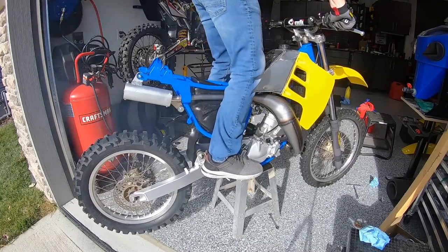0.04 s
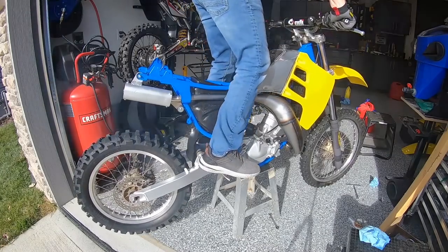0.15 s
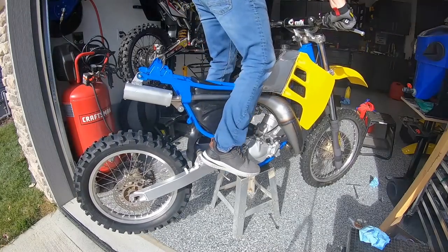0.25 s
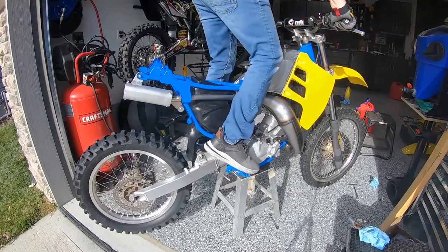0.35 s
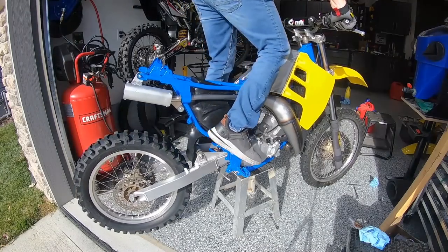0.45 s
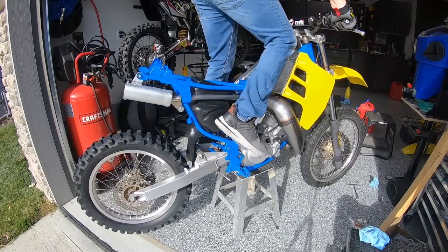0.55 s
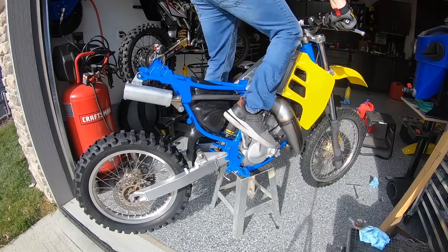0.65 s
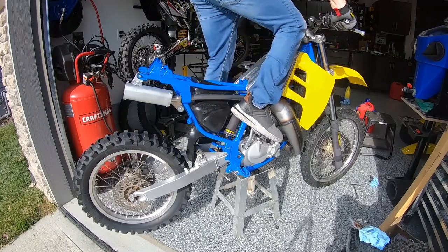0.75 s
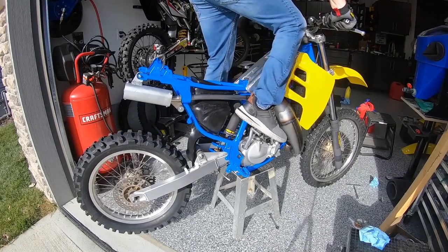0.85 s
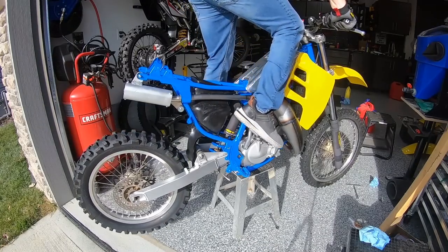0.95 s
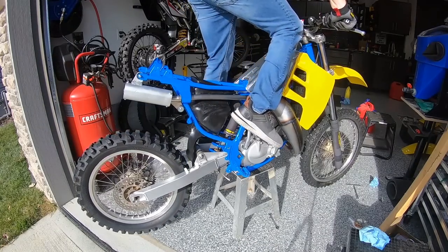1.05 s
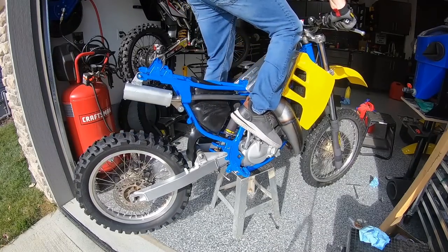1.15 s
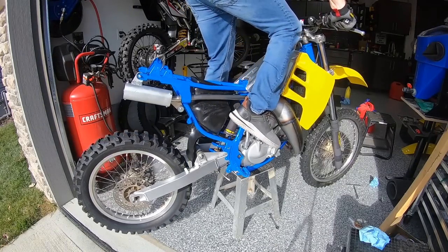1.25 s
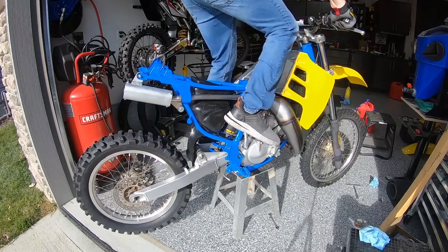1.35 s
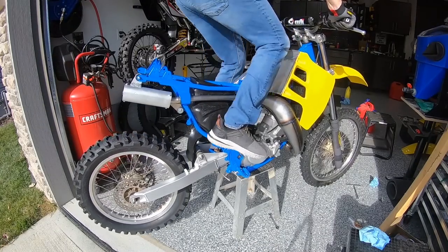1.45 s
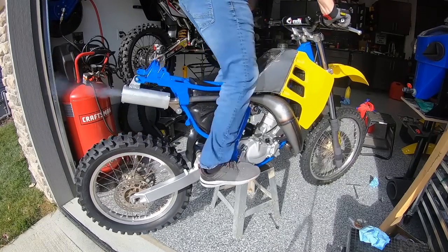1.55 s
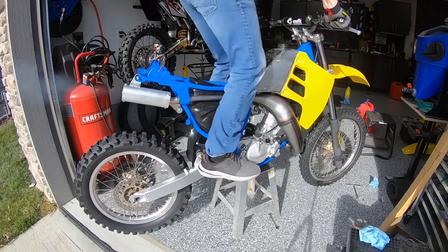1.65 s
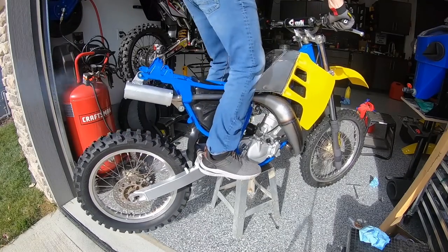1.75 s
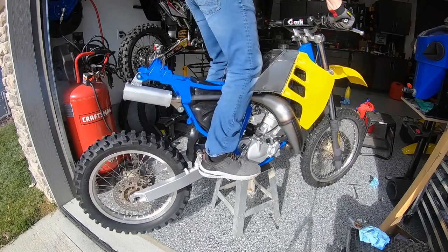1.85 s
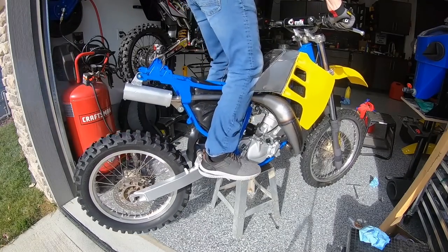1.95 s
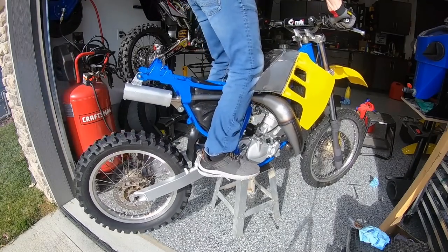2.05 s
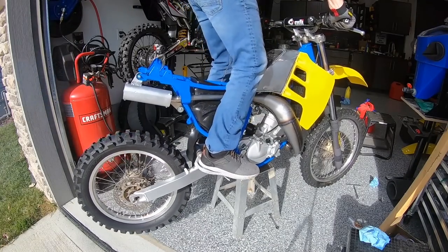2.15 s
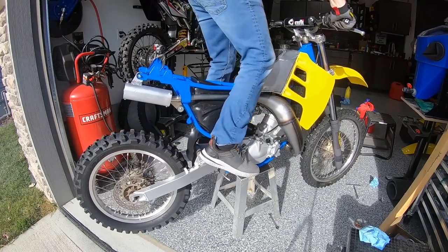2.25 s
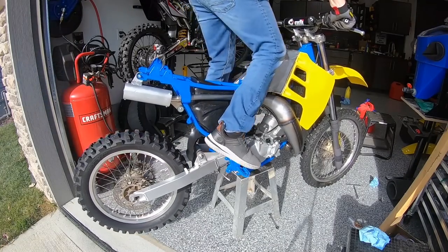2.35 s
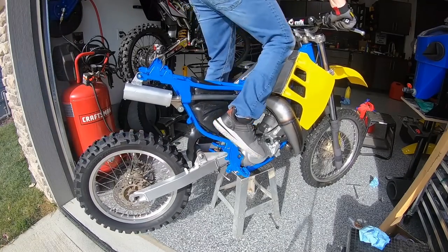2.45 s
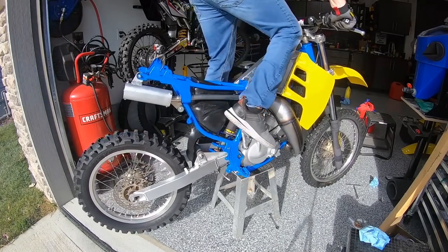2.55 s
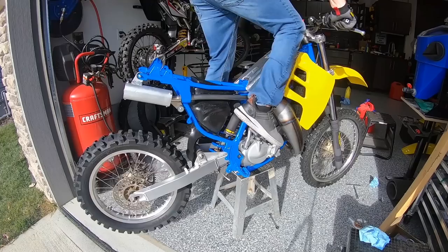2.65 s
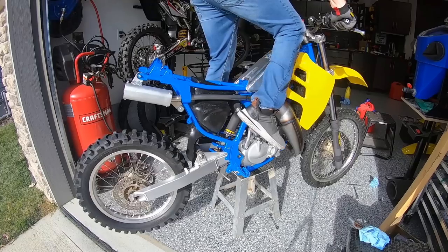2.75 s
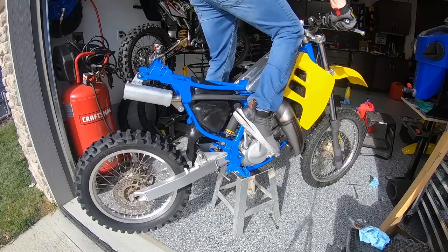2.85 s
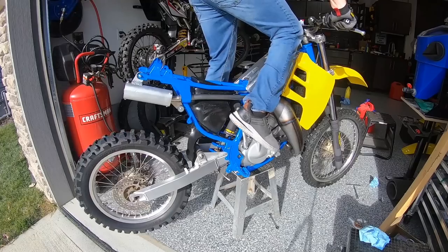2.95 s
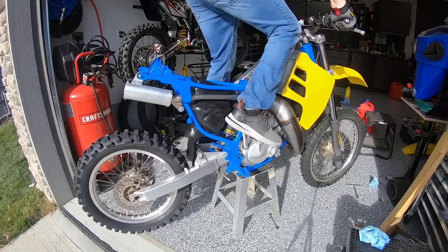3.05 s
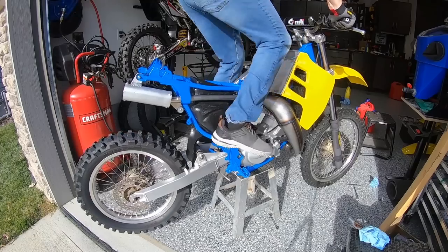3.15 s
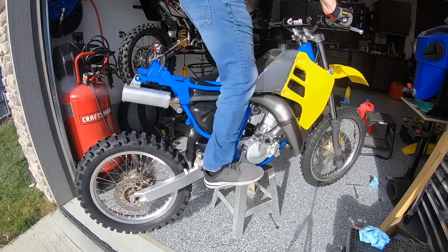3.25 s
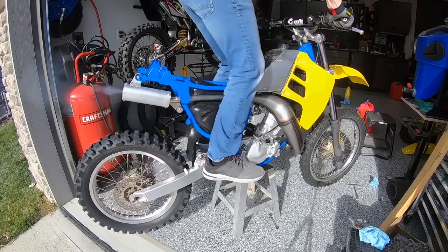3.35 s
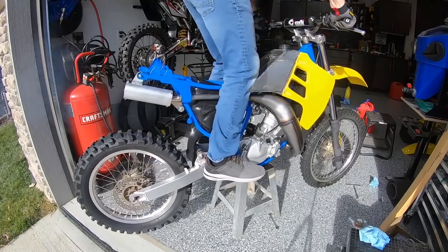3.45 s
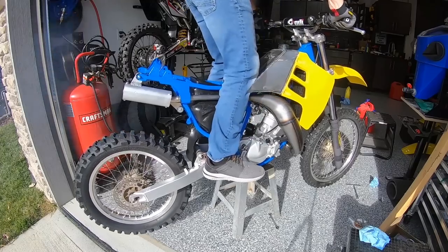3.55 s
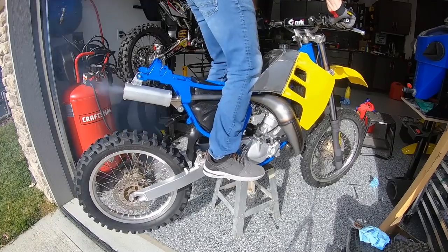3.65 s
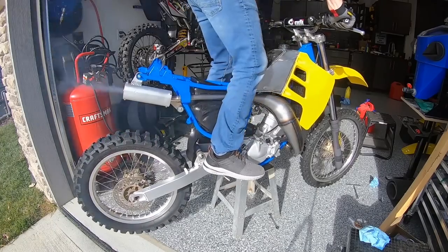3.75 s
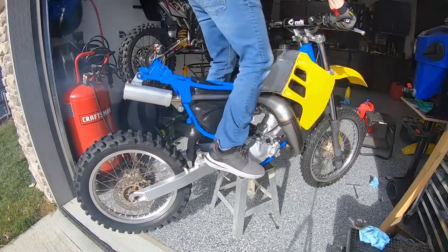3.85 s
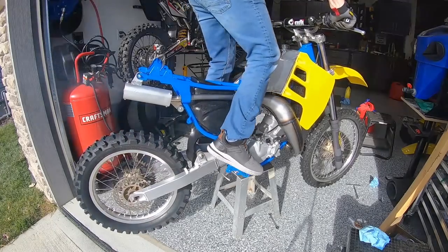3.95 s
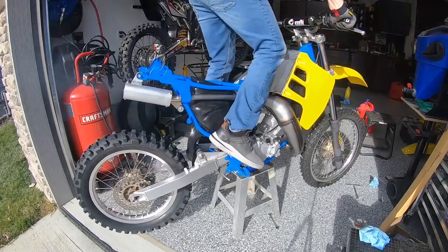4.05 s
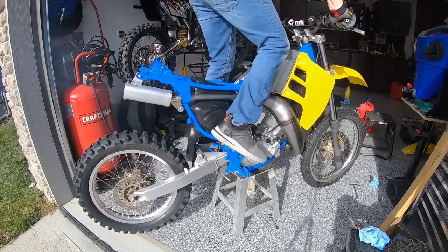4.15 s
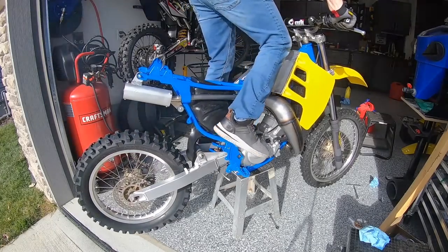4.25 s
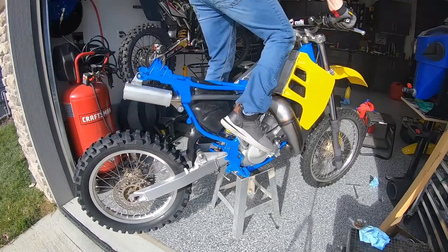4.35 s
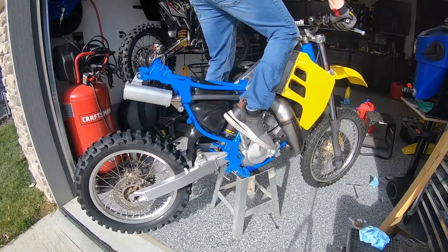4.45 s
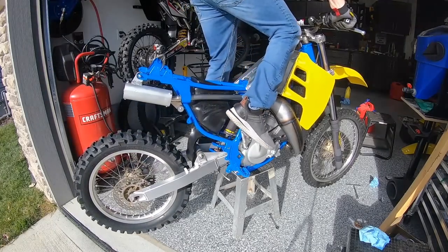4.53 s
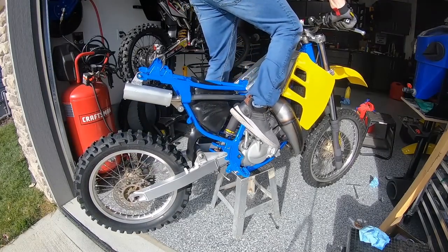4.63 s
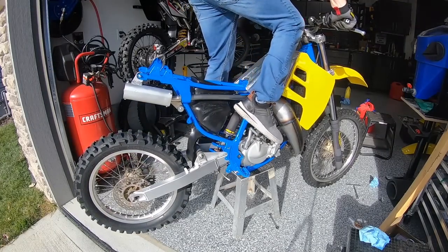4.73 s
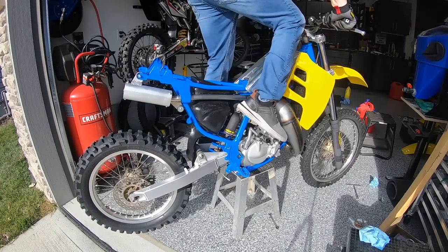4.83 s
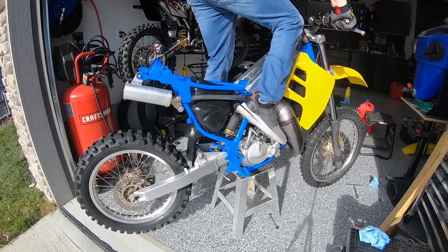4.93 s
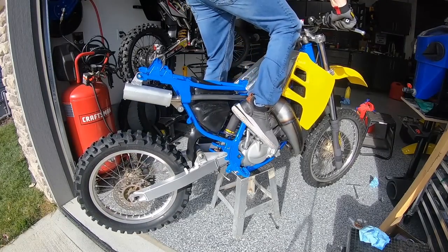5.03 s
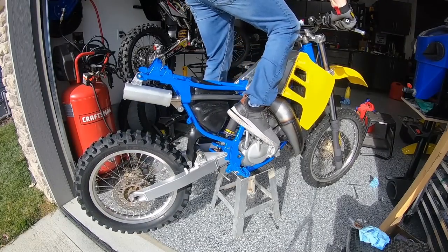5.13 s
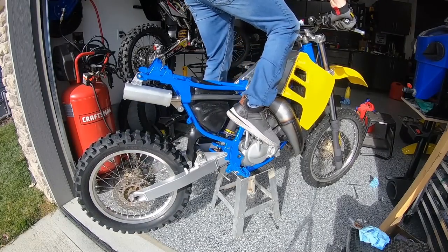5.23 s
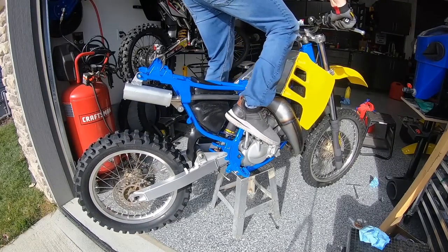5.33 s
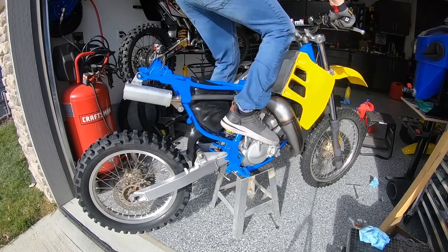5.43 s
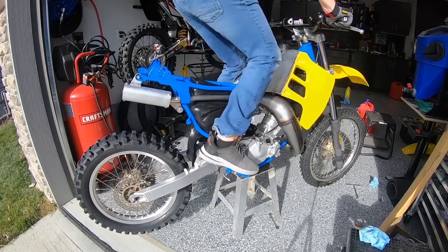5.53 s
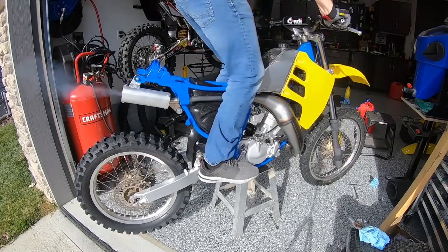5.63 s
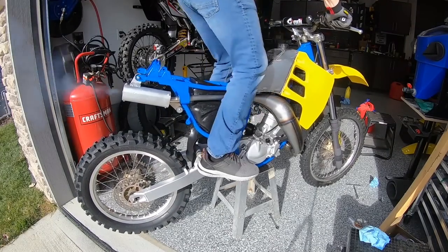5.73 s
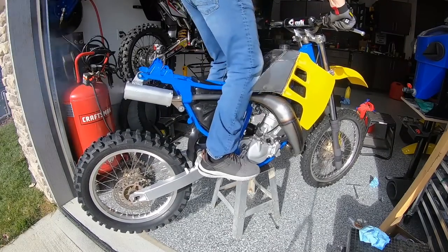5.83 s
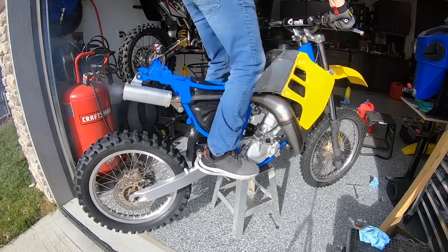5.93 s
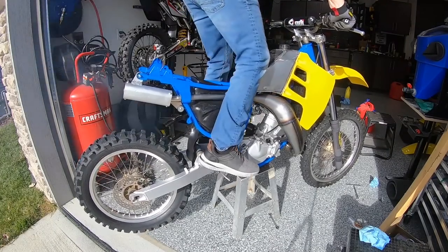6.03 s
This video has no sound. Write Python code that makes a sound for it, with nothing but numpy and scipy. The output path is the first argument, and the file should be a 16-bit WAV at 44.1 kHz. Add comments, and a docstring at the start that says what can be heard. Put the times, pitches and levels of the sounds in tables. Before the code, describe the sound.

Kick lever ratchets and clinks, then repeated kicks make a two-stroke engine bark, chuff and whirr briefly without catching, with wind buffeting the microphone.

```python
"""A two-stroke dirt bike on a stand in an open garage, in stereo, with light wind rumbling on the microphone.
First an attempt dies away: the kick lever's pawl ratchets, air whistles from the cylinder, the lever clinks.
The foot eases the piston to compression and kicks; chuffs boom in the pipe, charges bark, gears whirr and slow.
More ratcheting and whistles lead to a second kick, which nearly catches, then rattles down.
After gusts comes a third kick, its gears still whirring at the end. Noise, sines and resonances make it all."""
import sys
import numpy as np
from scipy import signal
from scipy.fft import rfft, irfft, next_fast_len
from scipy.io import wavfile
from scipy.ndimage import uniform_filter1d, map_coordinates

SR = 44100
rng = np.random.default_rng(int(sys.argv[2]) if len(sys.argv) > 2 else 0)


def wav_record(signal):
    """Record a signal, one row per channel, as 16-bit PCM in the file named by sys.argv[1]."""
    frames = np.transpose(np.atleast_2d(signal))
    bounded = np.clip(frames, -1, 1)
    # unit amplitude maps onto the largest positive 16-bit level
    quanta = np.round(bounded * 32767).astype(np.int16)
    wavfile.write(sys.argv[1], SR, quanta)


N = 268480
TIME = np.arange(N) / SR

# Levels in the tables are relative: the functions trim them. Spectra give level_db per Hz.
# wind rumble on the microphone: start_s, level_db
WIND_LEVEL = [(0, -31.5), (0.7, -36.5), (1.2, -34.5), (1.8, -37), (2.5, -39.5), (3.2, -35), (4.5, -36),
              (5, -37.5), (5.25, -29.5), (6.09, -34)]
# swells of low noise: gusts on the microphone, and at 3.65 s a low rumble under the second kick's run:
# start_s, length_s, level_db
LOW_SWELLS = [(3.08, 0.25, -39), (3.65, 0.78, -38), (4.38, 0.063, -33), (4.65, 0.28, -30),
              (5.09, 0.2, -24.5), (5.34, 0.32, -30.5)]
# spectrum of the wind rumble: pitch_hz, level_db
RUMBLE_SPECTRUM = [(8, 6.5), (20, -3.5), (36, -6.5), (56, -9), (85, -15.5), (150, -31), (300, -47),
                   (800, -93)]
# spectrum of the low swells: pitch_hz, level_db
SWELL_SPECTRUM = [(25, -23), (60, 3), (150, -3), (240, -15.5), (400, -31), (1000, -49), (3000, -87.5)]
# spectrum of the yard's hiss: pitch_hz, level_db
AIR_SPECTRUM = [(90, 4), (150, 1), (290, 3.5), (420, -8.5), (800, -12.5), (1300, -16.5), (2000, -19),
                (4500, -31.5), (6500, -27.5), (15500, -45.5)]
# decay of the garage's tail: pitch_hz, t60_s
GARAGE_DECAY = [(200, 0.66), (1000, 0.64), (4000, 0.45), (8000, 0.27), (14000, 0.49)]
# likeness of left and right in the direct sound: pitch_hz, correlation (1 = the same)
STEREO_LIKENESS = [(250, 1), (500, 0.91), (1000, 0.62), (2000, 0.67), (4000, 0.87), (8000, 0.026),
                   (13000, 0.086)]

# air leaking past the piston: start_s, length_s, level_db, pitch_hz
WHISTLES = [(0.248, 0.42, -64, 1242), (0.622, 0.58, -62.5, 1304), (2.617, 0.17, -59, 1305),
            (2.85, 0.2, -56.5, 1305), (4.695, 0.27, -67, 1283)]
# the lever clinking against its stop: start_s, level_db, pitch_hz (centre of the ring)
CLINKS = [(0.815, -18, 5700), (2.805, -30, 6300), (4.7853, -21.5, 6000), (5.145, -27.5, 7360)]
# sharp metal snaps: the kick lever's pawl dropping over its teeth, and at 3.326 s
# a metallic crack during the second kick: start_s, level_db
METAL_SNAPS = [(0.033, -14.5), (0.065, -15.5), (0.1, -16.5), (0.429, -28.5), (0.474, -20), (0.516, -28),
               (0.587, -18.5), (0.701, -16), (2.045, -13.5), (2.408, -19.5), (2.496, -19), (2.581, -18),
               (2.678, -19), (3.073, -38), (3.326, -8), (4.731, -31), (5.026, -32.5), (5.501, -33.5)]
# dull taps as the lever takes up its slack: start_s, level_db
LEVER_TAPS = [(0.005, -16.5), (1.025, -32), (2.922, -34), (2.948, -36), (3.144, -36), (3.187, -36),
              (3.225, -25), (5.116, -36.5), (5.457, -39), (5.523, -34)]
# ringing of the lever: pitch_hz, level_db, t60_s
LEVER_MODES = [(1994, -5.5, 0.3), (3160, -14, 0.27), (4100, -5, 0.17), (6200, -17, 0.42)]
# ringing of the crankcase after a blow: pitch_hz, level_db, t60_s
CASE_MODES = [(1985, -17, 0.43), (2600, -42, .09), (3772, -0.5, 0.1), (4270, -11.5, 0.13),
              (4880, -5.5, 0.097), (7900, -3, .06)]
# spectrum of a sharp metal snap or firing crack: pitch_hz, level_db
CLICK_SPECTRUM = [(900, -5), (2000, 4.5), (3500, 5), (5200, -2.5), (7000, 3), (9500, -4), (11300, -24),
                  (15000, -34)]
# spectrum of a thud in the frame: pitch_hz, level_db
BODY_SPECTRUM = [(250, -3), (750, 5), (1300, 3.5), (1900, 0.5), (3000, -5), (7000, -31)]

# the foot easing the piston up to compression: start_s, length_s, level_db
PUSHES = [(1.23, 0.28, -43)]
# spectrum of the starter gear's slow scrape: pitch_hz, level_db
SCRAPE_SPECTRUM = [(280, -3), (380, -5), (560, 4), (800, -7), (1500, -14), (2300, 1.5), (3000, 2),
                   (4200, -14), (7300, -3.5), (9500, -15), (12000, -38)]
# single gear knocks while the crank turns slowly: start_s, level_db
GEAR_KNOCKS = [(1.346, -17.5), (1.3992, -24), (1.4707, -23.5), (2.2091, -24), (2.237, -23.5), (2.2728, -23),
               (2.3092, -23.5), (4.253, -15.5), (4.2895, -14), (4.433, -26), (4.4783, -28), (4.508, -25),
               (4.537, -26.5), (4.58, -25.5), (4.624, -26)]
# spectrum of the gears' rattle: pitch_hz, level_db
RATTLE_SPECTRUM = [(2000, -23), (3800, -30), (5000, 2.5), (6000, 1.5), (7200, 4.5), (9500, -1),
                   (11300, -17.5), (14500, -23.5), (16000, -42)]
# spectrum of the gears' whirr: pitch_hz, level_db
WHIRR_SPECTRUM = [(1200, -33), (2100, 0), (2700, 0), (3900, -2.5), (4700, -4.5), (7000, -53)]
# resonances of the crankcase and its covers: pitch_hz, width_hz, level_db
COVER_RESONANCES = [(1946, 42, 6.5), (2580, 23, 4), (2990, 240, -5), (3780, 66, 6), (4090, 53, -9),
                    (5040, 120, -21)]

# crank speed, one curve for each run, the first already dying: start_s, speed_turns_per_s
SPEED_RUNS = [
    [(0, 18), (0.12, 10.5), (0.22, 5.5), (0.42, 2)],
    [(1.43, 5), (1.51, 9), (1.56, 26.7), (1.66, 25.9), (1.77, 35.4), (1.88, 23.3), (2.0, 17.7), (2.08, 8.9),
     (2.22, 7.8), (2.42, 3)],
    [(3.16, 3), (3.22, 8), (3.28, 24.1), (3.38, 28.7), (3.47, 43.3), (3.58, 25.1), (3.7, 19.6),
     (3.95, 21.4), (4.14, 18.9), (4.24, 11.6), (4.38, 8.4), (4.55, 5.5), (4.74, 2.5)],
    [(5.47, 3), (5.57, 6.5), (5.635, 25.5), (5.72, 34), (5.8, 48.4), (5.9, 49.5), (6.09, 41)],
]
# a chuff that sets the stroke timing of each run; the last three are kicks: start_s
CHUFF_MARKS = [0.012, 1.569, 3.281, 5.648]
# strength of the gas charge, one curve for each run; strong under the foot, weak as the engine
# coasts, up when it nearly catches: start_s, level_db
CHARGE_RUNS = [
    [(0, -29), (0.2, -35)],
    [(1.52, -35), (1.565, -3), (1.61, 0.5), (1.72, -2.5), (1.755, -18), (1.9, -46), (2.04, -13),
     (2.14, -12), (2.24, -34)],
    [(3.22, -46), (3.275, -1), (3.35, 1), (3.44, -8), (3.52, -41), (3.67, -27), (3.745, -6), (4.15, -15.5),
     (4.37, -13.5), (4.46, -37)],
    [(5.58, -43), (5.64, 0), (5.765, -2), (5.8, -7), (5.89, -22), (6.09, -45)],
]
# charges that fire: start_s, level_db (bark), crack_db
FIRINGS = [(1.57, -8, -18.5), (1.629, -6.5, -13), (1.703, -5, -20), (1.795, -7, -19), (2.121, -19.5, -10.5),
           (3.306, -8.5, -28), (3.378, -4.5, -19), (3.441, -9, -15.5), (3.722, -11.5, -11),
           (3.824, -5.5, -24), (3.917, -9, -16), (4.068, -8.5, -15), (4.218, -13.5, -13.5),
           (4.346, -17.5, -29), (5.67, -5, -13.5), (5.727, -8.5, -12.5), (5.782, -9, -22), (5.826, -9, -22),
           (6.046, -8.5, -26)]
# spectrum of the firing bark: pitch_hz, level_db
BARK_SPECTRUM = [(60, -17), (130, 7.5), (400, 1.5), (1000, -6), (1800, -8.5), (3000, -14.5), (6000, -37),
                 (12000, -37.5)]
# spectrum of gas rasping out: pitch_hz, level_db
RASP_SPECTRUM = [(250, -34), (420, 2), (700, 2.5), (860, -2), (1050, 1.5), (1500, -3), (1900, -9),
                 (2600, -12), (4000, -20), (9000, -46)]
# resonances of the pipe: pitch_hz, width_hz, level_db
PIPE_RESONANCES = [(130, 60, -11), (217.2, 12, -2.5), (263.2, 13.7, -1), (373, 57, -10.5),
                   (527.4, 7.5, -5.5), (690, 44, -23)]

PIPE_HZ = 261.8  # the note whose multiples colour the gas noise
CHUFF_HZ, CHUFF_HZ_PER_SPEED = 226.9, 0.57  # pitch of a chuff at rest; its rise for each turn per s
KNOCK_LEAD = 0.1489  # share of a turn by which knocks and puffs come ahead of the chuff
BLUR_SPEED = 55  # turns per s at which the steady mesh of the gears is as strong as their knocks
# under the foot the loaded gears rattle less: lead and half length in s, depth in dB
KICK_LEAD_S, KICK_S, KICK_GEAR_DB = 0.0088, 0.097, -8
# and more gas rasps out: delay and half length in s, height in dB
RASP_LAG_S, RASP_S, KICK_RASP_DB = 0.025, 0.055, 4
TOP_HZ = 15750  # band limit of the recorder


def amp(db):
    """Decibels to gain."""
    return 10 ** (np.asarray(db) / 20)


def unit(x):
    """Scale to rms 1."""
    return x / np.sqrt(np.mean(x ** 2) + 1e-20)


def along(points, hz):
    """Read a curve of (pitch_hz, value) points on a log frequency axis."""
    f, v = np.transpose(points)
    return np.interp(np.log(hz + 1), np.log(f + 1), v)


def wobble(rate):
    """A smooth random curve with rate knots a second."""
    knots = rng.standard_normal(int(N * rate / SR) + 4)
    return map_coordinates(knots, [TIME * rate])


def crackle(rate, depth_db):
    """Gain of rms 1 that breaks a noise into grains."""
    return unit(amp(depth_db * wobble(rate)))


def filtered(x, response):
    """Filter x by a complex response of frequency."""
    m = next_fast_len(N + SR // 2)
    hz = np.fft.rfftfreq(m, 1 / SR)
    return irfft(rfft(x, m) * response(hz), m)[..., :N]


def noise(spectrum, likeness=STEREO_LIKENESS):
    """Coloured stereo noise of rms 1, whose mid and side shares set the left-right likeness."""
    def mid_side(hz):
        turn = np.arccos(np.clip(along(likeness, hz), -1, 1)) / 2
        return amp(along(spectrum, hz)) * [np.cos(turn), np.sin(turn)]

    mid, side = filtered(rng.standard_normal((2, N)), mid_side)
    return unit(np.array([mid + side, mid - side]))


def resonant(hz, modes):
    """Summed response of (pitch_hz, width_hz, level_db) resonances with alternating sign."""
    total = 0
    for k, (centre, width, db) in enumerate(modes):
        damping = 1j * hz * width
        total = total + (-1) ** k * amp(db) * damping / (centre * centre - hz * hz + damping)
    return total


def add(track, s, sound):
    """Mix a sound into a track from time s."""
    part = track[..., max(round(s * SR), 0):][..., :sound.shape[-1]]
    part += sound[..., :part.shape[-1]]


def bursts(times, dbs, rise, t60):
    """Envelope of sharp blows that die away."""
    t, track = np.arange(SR // 4) / SR, np.zeros(N)
    shape = (1 - np.exp(-t / rise)) * amp(-60 * t / t60)
    for s, db in zip(times, dbs):
        add(track, s, amp(db) * shape)
    return track


def swells(rows, attack, release):
    """Envelope of (start_s, length_s, level_db) events that rise, hold and die away."""
    track = np.zeros(N)
    for s, length, db, *_ in rows:
        rise = np.clip((TIME - s) / attack, 0, 1)
        track += amp(db) * rise * np.exp(-np.maximum(TIME - s - length, 0) / release)
    return track


def ringing(times, dbs, modes):
    """Each blow rings the modes at new strengths, differently towards each side."""
    t, track = np.arange(SR // 2) / SR, np.zeros((2, N))
    for s, db in zip(times, dbs):
        for hz, mode_db, t60 in modes:
            size, phase = rng.standard_normal((2, 2, 1))
            decay = amp(db + mode_db + 2 * size - 60 * t / t60)
            add(track, s, decay * np.sin(2 * np.pi * hz * t + phase))
    return track


def outdoors():
    """Wind rumble and swells of low noise, stronger on the left, over the faint hiss of the yard."""
    rumble_db = 4.5 + np.interp(TIME, *np.transpose(WIND_LEVEL)) + 1.26 * wobble(6.4)
    rumble = amp(rumble_db) * noise(RUMBLE_SPECTRUM, [(50, 0.83)])
    swell_level = swells(LOW_SWELLS, attack=0.036, release=0.073) * amp(2.4 * wobble(7.8))
    low_swells = swell_level * noise(SWELL_SPECTRUM, [(100, 0.05)])
    hiss = amp(-46.5) * noise(AIR_SPECTRUM, [(200, 1.0), (2000, 0.47), (8000, .1)])
    return (rumble + low_swells) * amp([[1.8], [-1.8]]) + hiss


def garage(x, bass_db=-9):
    """The walls answer 5 ms later with a short noise tail, weak and alike on both sides in the bass."""
    hz, t, z = signal.stft(rng.standard_normal((2, SR * 2 // 3)), SR, nperseg=256)
    treble = np.clip((hz[:, None] - 350) / 400, 0, 1)
    z = z * treble + z[:1] * (1 - treble) * amp(bass_db)
    z = z * amp(-60 * t / along(GARAGE_DECAY, hz)[:, None])
    tail = signal.istft(z, SR, nperseg=256)[1]
    tail = np.pad(tail / np.linalg.norm(tail[0]), ((0, 0), (SR // 200, 0)))
    return signal.fftconvolve(x, tail, axes=1)[:, :N]


def whistle():
    """Compressed air leaks out in a thin, slightly unsteady tone."""
    waver = np.cumsum(1 + .003 * wobble(60)) / SR
    tones = np.zeros(N)
    for row in WHISTLES:
        tones += swells([row], attack=0.029, release=0.076) * np.sin(2 * np.pi * row[3] * waver)
    return amp(5.5) * tones * crackle(rate=9, depth_db=1.0)


def clinks(width_hz=1100, ring_db=-4, tail_db=-27):
    """The lever hits its stop; its spring shimmers on as a band of noise and the lever rings faintly."""
    track, snap = np.zeros((2, N)), noise(CLICK_SPECTRUM)
    for s, db, centre_hz in CLINKS:
        blow = bursts([s], [db - 9.5], rise=0.00077, t60=0.062)
        tail = bursts([s], [db + tail_db], rise=0.0075, t60=0.29)
        shimmer = unit(filtered(snap, lambda hz: resonant(hz, [(centre_hz, width_hz, 0)])))
        track += blow * snap + (amp(ring_db) * blow + tail) * shimmer
    s, db, _ = np.transpose(CLINKS)
    return track + ringing(s, db - 21.5, LEVER_MODES)


def snaps_and_taps():
    """Metal snaps, mostly the lever's pawl, ring the case; the lever taps as it takes up its slack."""
    s, db = np.transpose(METAL_SNAPS)
    snaps = bursts(s, db - 6.0, rise=0.0026, t60=0.053) * noise(CLICK_SPECTRUM)
    thuds = bursts(s, db - 20.5, rise=0.00081, t60=0.15) * noise(BODY_SPECTRUM)
    case = ringing(s, db - 19, CASE_MODES)
    s, db = np.transpose(LEVER_TAPS)
    taps = bursts(s, db - 9.5, rise=0.00088, t60=0.18) * noise(BODY_SPECTRUM)
    return snaps + thuds + case + taps


def covers(x, ring_db=3):
    """Gear noise partly radiates through the ringing covers."""
    return x + amp(ring_db) * filtered(x, lambda hz: resonant(hz, COVER_RESONANCES))


def slow_knocks(ring_db=-26):
    """At low speed the gear lash is heard knock by knock, and the lever's lowest mode rings with it."""
    s, db = np.transpose(GEAR_KNOCKS)
    rattle = noise(RATTLE_SPECTRUM) + covers(amp(-4) * noise(WHIRR_SPECTRUM))
    knocks = bursts(s, db - 11.5, rise=0.0014, t60=0.042) * rattle
    return knocks + ringing(s, db + ring_db, LEVER_MODES[:1])


def pipe(x):
    """The standing waves of the expansion chamber and silencer, dulled above 900 Hz."""
    return filtered(x, lambda hz: resonant(hz, PIPE_RESONANCES) / (1 + (hz / 900) ** 4))


def piped(x, reflection=0.22):
    """Gas noise runs to and fro in the pipe, which colours it with multiples of the pipe's note."""
    def response(hz):
        returned = reflection / (1 + (hz / 4000) ** 2)
        return 1 / (1 - returned * np.exp(-2j * np.pi * hz / PIPE_HZ))

    return unit(filtered(x, response))


def push(grumble_db=1):
    """Eased round slowly, the starter gear scrapes and gas grumbles unevenly in the pipe."""
    scrape = noise(SCRAPE_SPECTRUM) * crackle(rate=70, depth_db=3.0)
    grumble = amp(grumble_db) * unit(pipe(rng.standard_normal(N))) * crackle(rate=50, depth_db=6)
    return swells(PUSHES, attack=0.049, release=0.054) * (scrape + grumble)


def crank_speed():
    """Turns per s at every sample; zero between the runs."""
    return sum(np.interp(TIME, *np.transpose(run), left=0, right=0) for run in SPEED_RUNS)


def strokes(run, mark_s, count=1, lead=0):
    """Times at which the crank of one run passes its place at mark_s, count times a turn."""
    t = TIME[(TIME >= run[0][0]) & (TIME <= run[-1][0])]
    turns = np.cumsum(np.interp(t, *np.transpose(run))) / SR
    marks = np.floor(count * (turns - np.interp(mark_s, t, turns) + lead))
    return t[1:][np.diff(marks) > 0]


def with_speed(speed, db, knee, power):
    """Gain that grows as a power of the crank speed and levels off at db above the knee."""
    return amp(db) / np.sqrt(1 + (knee / (speed + 1e-3)) ** (2 * power))


def under_foot(lag_s, width_s):
    """A bump from 0 to 1 around each of the three kicks."""
    return sum(np.exp(-((TIME - s - lag_s) / width_s) ** 2) for s in CHUFF_MARKS[1:])


def even(gate):
    """Level a pulsing gain to a running rms of 1, so that the pulses do not change the overall loudness."""
    return gate / np.sqrt(np.abs(uniform_filter1d(gate ** 2, SR // 12)) + 1e-9)


def gears(knock_rise=0.0012, knock_life=0.0036, scatter_db=5.16):
    """Gears knock twice a turn over a steady mesh; whirr and rattle grow with crank speed."""
    t, knocks = np.arange(SR // 10) / SR, np.zeros(N)
    shape = (1 - np.exp(-t / knock_rise)) * np.exp(-t / knock_life)
    for run, mark_s in zip(SPEED_RUNS, CHUFF_MARKS):
        for s in strokes(run, mark_s, count=2, lead=KNOCK_LEAD):
            add(knocks, s, amp(scatter_db * rng.standard_normal()) * shape)
    speed, load = crank_speed(), under_foot(-KICK_LEAD_S, KICK_S)
    whirr = with_speed(speed, db=-32.5, knee=20.4, power=2.13) * amp(-3.5 * load)
    clatter = with_speed(speed, db=-35.5, knee=17.4, power=4.3) * amp(KICK_GEAR_DB * load)
    # loose parts rattle on as the crank slows
    loose = with_speed(speed, db=-48, knee=9.1, power=2.7) * amp(KICK_GEAR_DB * load)
    teeth = even(speed / BLUR_SPEED + knocks) * crackle(rate=780, depth_db=2.5)
    rattle = clatter * teeth + loose * crackle(rate=90, depth_db=5.0)
    return covers(whirr * teeth * noise(WHIRR_SPECTRUM)) + rattle * noise(RATTLE_SPECTRUM)


def exhaust(puff_life=0.0044, scatter_db=5.16):
    """Once a turn the port puffs into the pipe; its drone and gas rasp grow with crank speed."""
    puffs, pulses = np.zeros((2, N))
    t = np.arange(SR // 10) / SR
    for run, mark_s in zip(SPEED_RUNS, CHUFF_MARKS):
        for s in strokes(run, mark_s, lead=KNOCK_LEAD):
            size = amp(scatter_db * rng.standard_normal(1))
            add(puffs, s, size * np.exp(-t / puff_life))
            add(pulses, s, size)  # a single sample
    speed = crank_speed()
    drone = with_speed(speed, db=-23.5, knee=24, power=1.86)
    rush = amp(KICK_RASP_DB * under_foot(RASP_LAG_S, RASP_S))
    rasp = with_speed(speed, db=-31.5, knee=17.55, power=2.5) * rush
    gas = even(1 + puffs) * crackle(rate=350, depth_db=2.0) * crackle(rate=40, depth_db=0.93)
    throb = unit(pipe(pulses)) * .45 + unit(pipe(gas * rng.standard_normal(N))) * .75
    return drone * throb + rasp * gas * piped(noise(RASP_SPECTRUM))


def bangs(bark_db=-4.0):
    """A firing charge barks out of the silencer with a crack on top."""
    s, db, crack_db = np.transpose(FIRINGS)
    bark = bursts(s, db + bark_db, rise=0.0045, t60=0.085) * piped(noise(BARK_SPECTRUM))
    crack = bursts(s, db + crack_db, rise=0.0017, t60=0.079) * noise(CLICK_SPECTRUM)
    return bark + crack


def chuffs(swell=0.005, fall=0.0044, echo_s=0.01868, echo_db=-11, upper_hz=395, upper_db=-15,
           ring_db=-6.5, direct_db=-2.0, scatter_db=0.45):
    """Once a turn a slug of gas booms with a weak upper tone, returns once and leaves the pipe ringing."""
    lead = SR // 25  # room for the swell ahead of each stroke
    t, track = np.arange(-lead, lead) / SR, np.zeros(N + lead)
    shape = 1 / np.cosh(t / np.where(t < 0, swell, fall) * np.sqrt(2))
    for run, mark_s, charge in zip(SPEED_RUNS, CHUFF_MARKS, CHARGE_RUNS):
        for s in strokes(run, mark_s):
            size, start, detune, upper_start = rng.standard_normal(4)
            db = np.interp(s, *np.transpose(charge)) + scatter_db * size
            speed = np.interp(s, *np.transpose(run))
            hz = CHUFF_HZ + CHUFF_HZ_PER_SPEED * speed + 9 * detune
            tone = np.cos(2 * np.pi * hz * t + 1.08 * start)
            upper = amp(upper_db) * np.sin(2 * np.pi * upper_hz * t + 2 * upper_start)
            boom = amp(db) * shape * (tone + upper)
            add(track, s, boom)
            add(track, s + echo_s, amp(echo_db) * boom)
    booms = track[lead:]
    return amp(direct_db) * booms + amp(ring_db) * pipe(booms)


def scene():
    """The bike a hair right of centre, the garage around it and the weather on the microphone."""
    engine = chuffs() + bangs() + exhaust() + gears() + push()
    metal = slow_knocks() + snaps_and_taps() + clinks() + whistle()
    bike = (engine + metal) * amp([[-.2], [.2]])
    return bike + garage(amp(-8.0) * engine + amp(-7) * metal) + outdoors()


def record(dry):
    """The recorder rounds the loudest crests, blocks steady pressure and cuts all above its band limit."""
    rounded = dry / (1 + (dry / .92) ** 8) ** (1 / 8)
    return filtered(rounded, lambda hz: (hz < TOP_HZ) * hz / (hz + 4))


dry = scene()
out = record(dry)
wav_record(out)
```